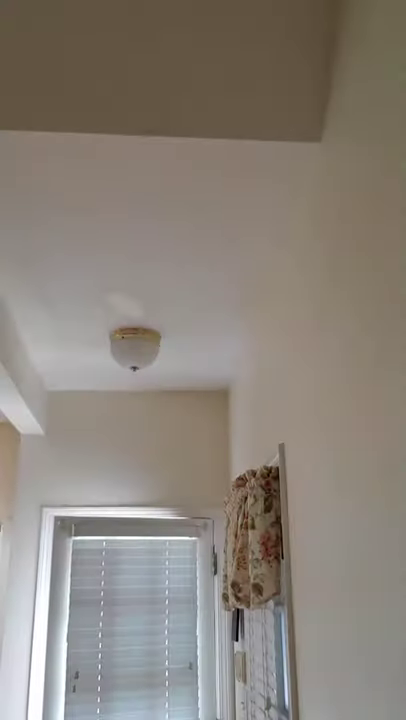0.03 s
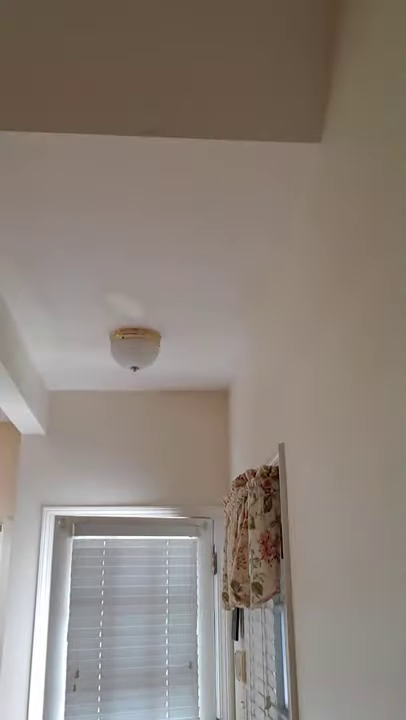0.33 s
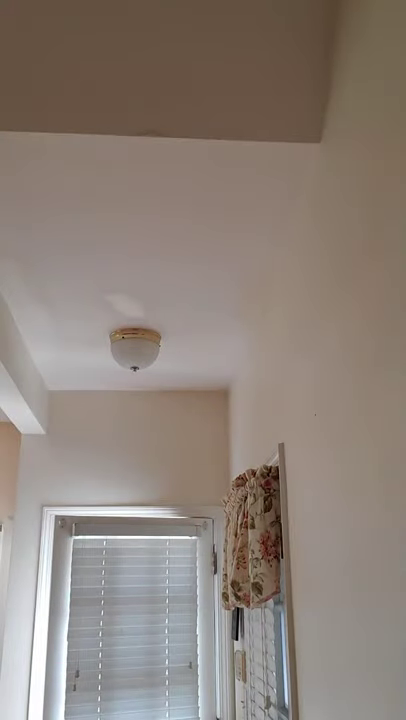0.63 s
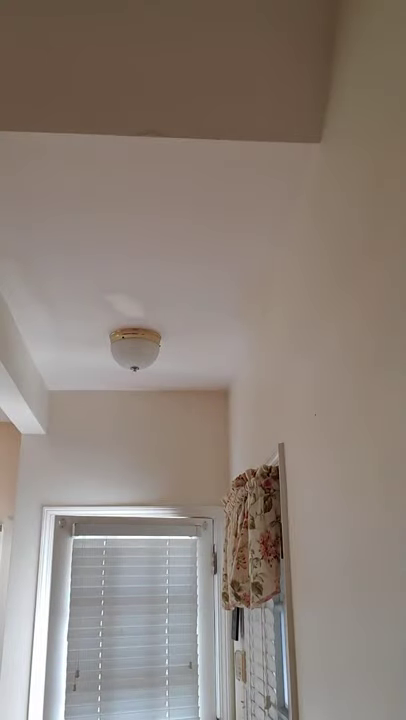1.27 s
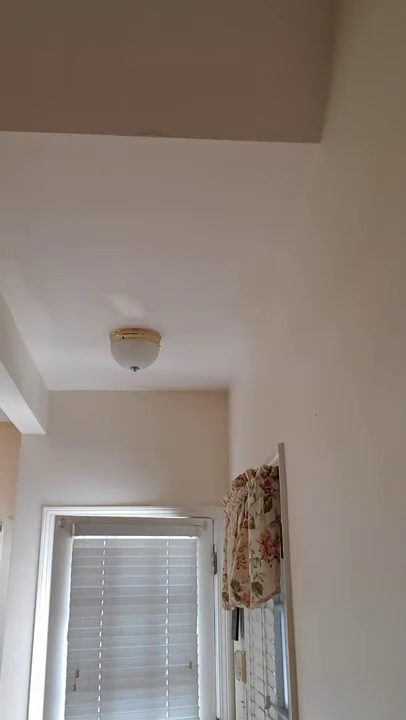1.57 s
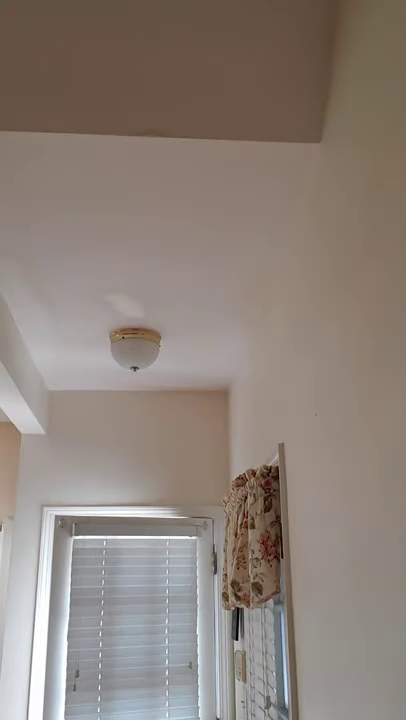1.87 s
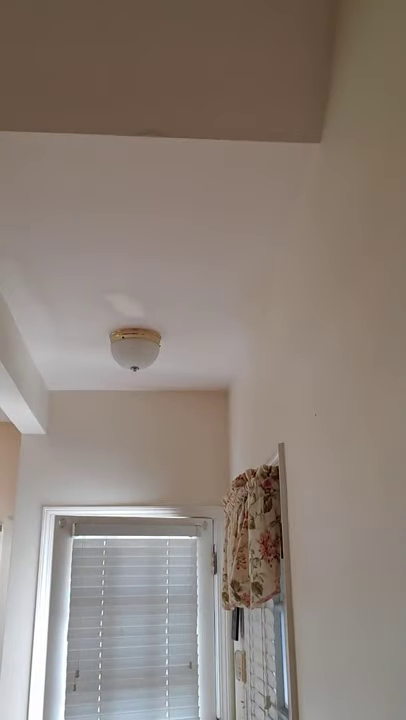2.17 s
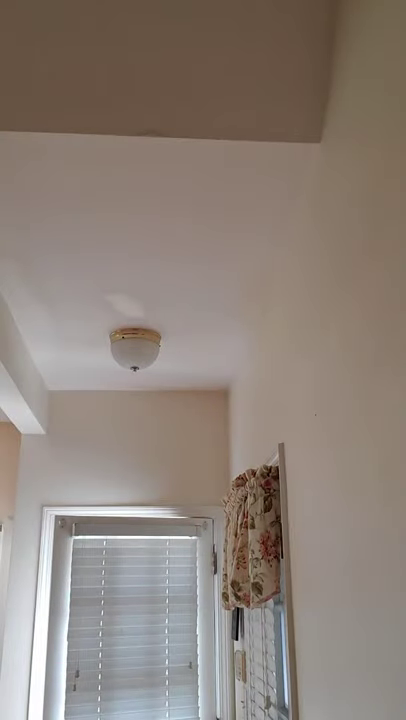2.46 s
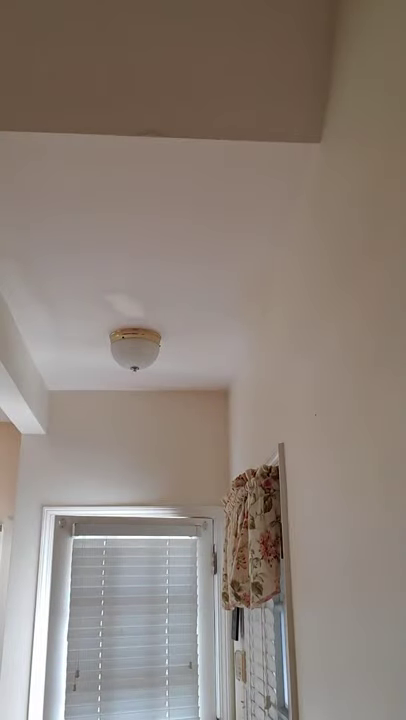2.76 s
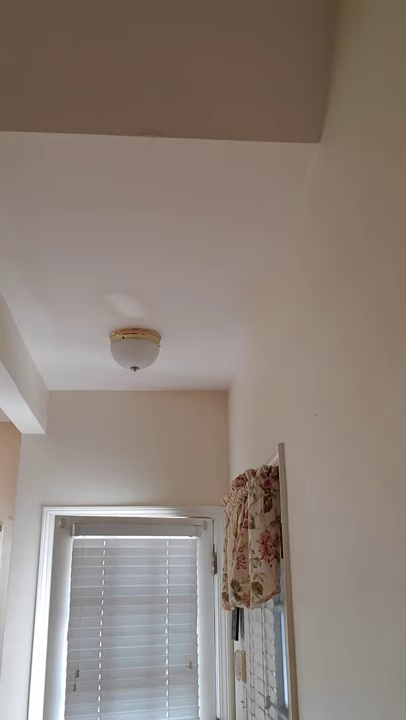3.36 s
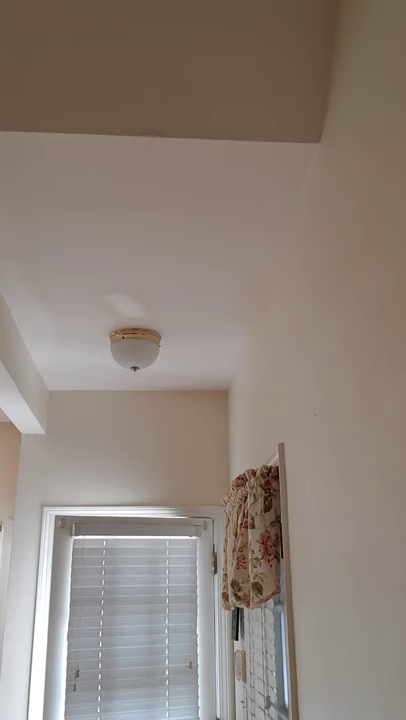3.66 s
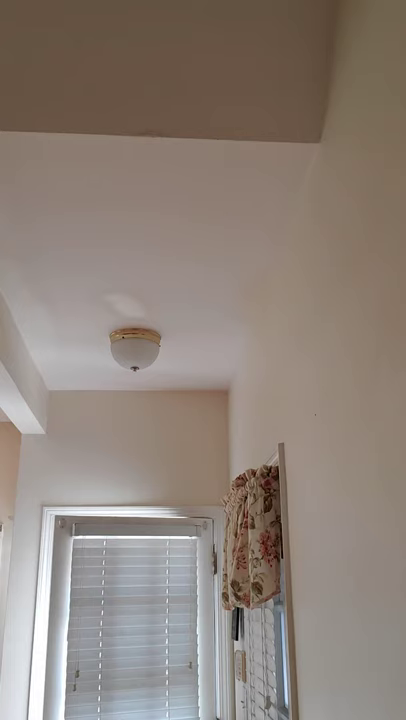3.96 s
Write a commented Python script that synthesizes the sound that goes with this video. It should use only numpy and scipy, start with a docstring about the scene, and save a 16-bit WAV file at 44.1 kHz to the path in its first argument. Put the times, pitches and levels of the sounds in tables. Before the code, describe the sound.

Dull footsteps thump on the floor above, over a low rumble in a quiet room.

```python
"""Footfalls from the floor above

Dull thumps, about three a second, come through the structure of a quiet room. Each blow bends
the ceiling for a cycle or two, sets the room's deep notes booming and knocks the boards.
Under them lie a low rumble, a weak hum, faint hiss, a wavering whine and soft, dull rustles,
one with a tiny squeak. A high hiss swells around the thumps, mostly on the left."""
import sys
import numpy as np
from scipy import signal
from scipy.fft import rfft, irfft
from scipy.io import wavfile

SR = 44100
rng = np.random.default_rng(int(sys.argv[2]) if len(sys.argv) > 2 else 0)


def wrap_up_sound(samples):
    """Save the sound to the file named by the first command line argument, as 16-bit audio."""
    columns = np.atleast_2d(samples).T
    # keep every value between -1 and 1, then stretch to whole-number steps
    tamed = np.clip(columns, -1, 1)
    steps = np.round(tamed * 32767).astype(np.int16)
    wavfile.write(sys.argv[1], SR, steps)


N = 176400
TIME_S, FREQS_HZ = np.arange(N) / SR, np.fft.rfftfreq(N, 1 / SR)


def amp(db):
    """Turns decibels into a number to multiply a sound by."""
    return 10 ** (np.asarray(db) / 20)


def unit_level(sound):
    """Scales a sound so that its average strength (rms) is 1."""
    return sound / np.sqrt(np.mean(sound ** 2) + 1e-20)


def curve(points):
    """Joins a table's points to give a value at every frequency."""
    hz, value = np.transpose(points)
    return np.interp(np.log(FREQS_HZ + 1), np.log(hz + 1), value)


def pan(left_db):
    """Raises the left side and lowers the right; a negative number does the opposite."""
    return amp([[left_db], [-left_db]])


def drift(rate_hz):
    """A smooth random wander; a higher rate makes it quicker."""
    spectrum = rfft(rng.standard_normal(N))
    return unit_level(irfft(spectrum * np.exp(-(FREQS_HZ / rate_hz) ** 2), N))


def fuzzy_tone(pitch_hz, width_hz):
    """A breathy tone: a band of noise around a pitch, unrelated on the left and right."""
    angle = 2 * np.pi * np.cumsum(pitch_hz * np.ones(N)) / SR
    return np.array([unit_level(drift(width_hz) * np.cos(angle) + drift(width_hz) * np.sin(angle))
                     for _ in range(2)])


# How alike left and right sound (1 is identical): frequency_hz, likeness
STEREO_LIKENESS = [(270, 0.97), (500, 0.97), (900, 0), (3000, 0)]

def noise(colour):
    """Stereo noise, alike on both sides in the bass; colour says how strong each frequency is."""
    left, unrelated = rfft(rng.standard_normal((2, N)))
    likeness = curve(STEREO_LIKENESS)
    right = likeness * left + np.sqrt(1 - likeness ** 2) * unrelated
    return unit_level(irfft(np.array([left, right]) * amp(curve(colour)), N))


# Colour of the room's rumble: frequency_hz, relative_db
RUMBLE_COLOUR = [(15, -60.5), (28, -22.5), (42, 6), (65, -5), (90, 2), (150, -10.5), (230, -20),
                 (700, -35.5), (950, -54.5), (2000, -86.5)]

def rumble(start_db=-44, fade_db_per_s=1.02):
    """Deep noise that slowly gets quieter."""
    return amp(start_db - fade_db_per_s * TIME_S) * noise(RUMBLE_COLOUR)


# The tones in the hum: pitch_hz, level_db
HUM_TONES = [(86, -56), (113, -54), (231.5, -70)]

def hum(waver=0.24):
    """Three low tones that waver in loudness and pitch."""
    sound = np.zeros(N)
    for pitch_hz, level_db in HUM_TONES:
        loudness = np.sqrt(2) * amp(level_db) * (1 + waver * drift(rate_hz=9.5))
        sound += loudness * np.sin(2 * np.pi * pitch_hz * TIME_S + waver * drift(rate_hz=7.5))
    return sound


# Colour of the hiss on each side: frequency_hz, relative_db
LEFT_HISS_COLOUR = [(1100, -7.5), (1700, 4), (2250, -1), (3500, 8.5), (4700, 2), (5400, 5), (6800, -8.5),
                    (8000, -25.5), (12000, -14), (15500, -13.5)]
RIGHT_HISS_COLOUR = [(300, 20), (1100, -2.5), (1800, -2.5), (2400, -8), (5500, -12), (7000, -6.5),
                     (9000, -15.5), (12500, -8.5), (15500, -12.5)]

def hiss(start_db=-64.5, fade_db_per_s=0.48, flicker_db=0.55):
    """Each microphone's own hiss, flickering slightly as it slowly fades."""
    sides = np.array([noise(LEFT_HISS_COLOUR)[0], noise(RIGHT_HISS_COLOUR)[1]])
    return sides * amp(start_db + flicker_db * drift(rate_hz=12) - fade_db_per_s * TIME_S)


# The path the whine glides along: time_s, pitch_hz, level_db
WHINE_PATH = [(0, 1636, -72.5), (.28, 1760, -75.5), (.46, 1650, -75), (.56, 1604, -89.5), (.95, 1601, -71),
              (1.5, 1740, -71.5), (1.9, 1620, -96.5), (2.6, 1764, -96.5), (2.68, 1770, -74),
              (3.02, 1560, -78.5), (3.075, 1964, -67.5), (3.15, 1920, -75), (3.216, 1620, -67.5),
              (3.331, 1790, -74), (3.421, 1950, -69), (3.57, 1938, -70.5), (3.68, 1780, -78),
              (3.92, 1520, -75)]
# Weaker tones that join the whine once it narrows: pitch_hz, relative_db
WHINE_SIDE_TONES = [(725, -5), (2620, -9.5)]

def whine(narrows_at_s=3.2, echo_s=0.38):
    """A far, airy tone, broad at first and then narrow; its own echo overlaps each glide."""
    time_s, pitch_hz, level_db = np.transpose(WHINE_PATH)
    glide_hz = np.interp(TIME_S, time_s, pitch_hz)
    loudness = amp(np.interp(TIME_S, time_s, level_db))
    narrow = fuzzy_tone(glide_hz, width_hz=111)
    narrow += sum(amp(db) * fuzzy_tone(hz, width_hz=43) for hz, db in WHINE_SIDE_TONES)
    broad = fuzzy_tone(glide_hz, width_hz=300)
    tone = loudness * np.where(TIME_S < narrows_at_s, broad, narrow)
    echo = rng.standard_normal((2, SR)) * amp(-60 * TIME_S[:SR] / echo_s)
    echo /= np.linalg.norm(echo[0])
    return signal.fftconvolve(tone, echo, axes=1)[:, :N] * pan(left_db=2.5)


def swell(peak_s, width_s):
    """A smooth, bell-shaped rise and fall in loudness."""
    return np.exp(-0.5 * ((TIME_S - peak_s) / width_s) ** 2)


def squeak(level_db=-77):
    """A brief, thin squeak during one of the rustles."""
    loudness = amp(level_db) * swell(peak_s=1.735, width_s=0.039)
    return loudness * fuzzy_tone(pitch_hz=3830, width_hz=190) * pan(left_db=8.5)


# When the rustles and the high hiss swell: peak_s, width_s, rustle_db, hiss_db
SWELLS = [(.045, 0.081, -64.5, -83), (.2, .05, -74.5, -73.5), (.44, 0.064, -70, -72.5),
          (.755, 0.07, -72.5, -75.5), (0.979, 0.086, -67, -74), (1.27, 0.087, -70.5, -72.5),
          (1.52, 0.053, -70, -74.5), (1.745, 0.077, -67, -73.5), (1.935, 0.03, -68, -77),
          (2.17, 0.15, -79, -76), (2.396, 0.042, -72, -72), (2.679, 0.095, -75.5, -73.5),
          (3.0, 0.047, -71, -70.5), (3.58, 0.065, -73, -73), (3.94, 0.08, -78, -78.5)]
# Colours of the rustles and of the high hiss: frequency_hz, relative_db
RUSTLE_COLOUR = [(200, -4), (700, 0), (1100, -0.5), (1380, 1.5), (1800, -4.5), (2500, -15), (9000, -57.5)]
HIGH_HISS_COLOUR = [(1200, -9.5), (2300, 1.5), (2900, 7), (3700, 6.5), (4700, 0), (5500, 0), (7000, -6),
                    (8500, -20.5), (15500, -23.5)]

def rustles_and_high_hiss(flutter_db=0.5):
    """Soft, dull rustles, and a high hiss that swells around the thumps, mostly on the left."""
    rustle, high_hiss = np.zeros((2, N))
    for peak_s, width_s, rustle_db, hiss_db in SWELLS:
        rustle += amp(rustle_db) * swell(peak_s, width_s)
        high_hiss += amp(hiss_db) * swell(peak_s, width_s)
    rustle *= amp(flutter_db * drift(rate_hz=38))
    return (rustle * noise(RUSTLE_COLOUR) * pan(left_db=1.5)
            + high_hiss * noise(HIGH_HISS_COLOUR) * pan(left_db=8.5))


# One row for each knock of the boards: start_s, length_s, body_db, clack_db
BOARD_KNOCKS = [(0.035, 0.12, -58, -56.5), (0.175, 0.05, -44.5, -53), (0.364, 0.025, -52, -61),
                (0.455, 0.03, -44, -53), (0.636, 0.025, -49.5, -63.5), (0.718, 0.1, -43, -57),
                (0.888, 0.2, -52.5, -57.5), (1.189, 0.058, -42.5, -57.5), (1.466, 0.029, -47, -61),
                (1.86, 0.025, -46, -61), (1.914, 0.096, -52, -55), (2.077, 0.074, -53.5, -62.5),
                (2.355, 0.064, -41, -58), (2.613, 0.016, -38.5, -56.5), (2.629, 0.012, -31, -42),
                (2.934, 0.17, -44.5, -58.5), (3.528, 0.14, -50.5, -55.5), (3.861, 0.05, -47, -55)]
# Colours of a knock's two parts: frequency_hz, relative_db
BODY_COLOUR = [(90, -45), (140, -0.5), (160, 3), (173, -11), (188, 0.5), (245, -1.5), (275, -8),
               (360, -10.5), (440, -19.5), (800, -79)]
CLACK_COLOUR = [(200, -54), (340, 2.5), (420, 2.5), (490, 0), (720, -6.5), (900, -23), (1400, -40),
                (6500, -46), (15000, -89)]

def knocks(rise_s=0.007, ring_s=0.28, echo_s=0.4, echo_db=-7):
    """The boards shudder under the blows: a woody body and a dull clack, then a short room echo."""
    body_power, clack_power = np.zeros((2, N))
    for start_s, length_s, body_db, clack_db in BOARD_KNOCKS:
        rise = np.clip((TIME_S - start_s) / rise_s + 0.5, 0, 1)
        # A knock holds for 39% of its length before it starts to fade.
        fading_s = np.maximum(TIME_S - start_s - 0.39 * length_s, 0)
        ring = (1 - amp(echo_db)) * amp(-60 * fading_s / ring_s)
        echo = amp(echo_db - 60 * fading_s / echo_s)
        shape = rise * (ring + echo)
        body_power += (shape * amp(body_db)) ** 2
        clack_power += (shape * amp(clack_db)) ** 2
    return (np.sqrt(body_power) * noise(BODY_COLOUR)
            + np.sqrt(clack_power) * noise(CLACK_COLOUR) * pan(left_db=-2.5))


# The room's own deep notes: pitch_hz, relative_db, ring_s (time to fade by 60 dB)
ROOM_NOTES = [(37.3, -14, 0.44), (58.2, -16, 0.56), (86.4, -15.5, 0.57), (112.65, -5.5, 0.37),
              (155, -26, .35), (186, -7, 0.41), (258, -14.5, 0.18)]

def room_boom(thumps):
    """The air in the room rings on at its own deep notes after each swing of the ceiling."""
    t = TIME_S[:SR]
    ring = sum(amp(db - 60 * t / ring_s) * np.cos(2 * np.pi * hz * t) * hz / SR
               for hz, db, ring_s in ROOM_NOTES)
    return signal.fftconvolve(thumps, ring)[:N]


# One row for each swing: a bend of the ceiling, or, for the rows at a few hundred Hz, a pitched ringing knock
# of the boards: peak_s, level_db, pitch_hz, rise_cycles
BLOW_SWINGS = [(0.14, -31, 49.7, 1.3), (.198, -33.5, 66, 0.93), (0.378, -35, 110, 1.1),
               (0.413, -33.5, 53.5, 0.82), (0.46, -28.5, 73.4, 1.3), (.652, -51, 370, 7.2),
               (0.659, -26.5, 60.8, 0.7), (0.71, -29, 52, 1.53), (.738, -37.5, 310, 3.4),
               (0.742, -29.5, 97.8, 2.15), (0.769, -27.5, 70, 0.79), (0.902, -18.5, 68.3, 0.59),
               (.928, -21, 70.7, 0.96), (0.969, -25, 53.6, 0.77), (1.213, -22.5, 72.4, 0.39),
               (1.245, -27.5, 62, 0.57), (1.278, -28, 62, 0.38), (1.482, -24.5, 66, 0.69),
               (1.506, -26, 63.6, 0.63), (1.849, -25, 71.2, 0.62), (1.884, -36.5, 105.4, 1.48),
               (2.114, -22.5, 79.5, 1.27), (2.364, -37.5, 228.7, 2.55), (2.381, -23, 50.4, 0.71),
               (2.402, -26, 78, 0.78), (2.436, -31.5, 51.8, 0.98), (2.632, -16, 87.7, 0.61),
               (2.668, -31, 96.2, 3.3), (2.955, -13.5, 65.8, 0.47), (2.972, -21.5, 83, 0.56),
               (2.997, -19.5, 76.7, 0.43), (3.013, -22.5, 98, 0.85), (3.050, -28, 63.7, 2.04),
               (3.108, -31.5, 51, 1.05), (3.547, -36, 60.5, 1.9), (3.599, -29.5, 59, 1.27),
               (3.919, -38.5, 62, 2.3)]

def ceiling_thumps(fall_to_rise_ratio=1.09, low_cut_hz=32):
    """Each blow bends the ceiling in a swing that dies fast, and a few blows make the boards ring with a short
    pitched knock; the deepest bass never reaches the air."""
    swings = np.zeros(N)
    for peak_s, level_db, pitch_hz, rise_cycles in BLOW_SWINGS:
        cycles = (TIME_S - peak_s) * pitch_hz
        width = np.where(cycles < 0, rise_cycles, rise_cycles * fall_to_rise_ratio)
        swings += amp(level_db) * np.cos(2 * np.pi * cycles) * np.exp(-(cycles / width) ** 2)
    low_cut = 1 - np.exp(-(FREQS_HZ / low_cut_hz) ** 4)
    return irfft(rfft(swings) * low_cut, N)


def scene():
    """Thumps with their boom and knocks, over the faint sounds of the room."""
    thumps = ceiling_thumps()
    footfalls = thumps + room_boom(thumps) + knocks()
    return footfalls + rustles_and_high_hiss() + squeak() + whine() + rumble() + hum() + hiss()


def record(dry):
    """Cuts away the very highest treble."""
    treble_cut = signal.firwin(511, cutoff=15600, window=("kaiser", 9), fs=SR)
    return signal.oaconvolve(dry, treble_cut[None], "same")


dry = scene()
out = record(dry)
wrap_up_sound(out)
```